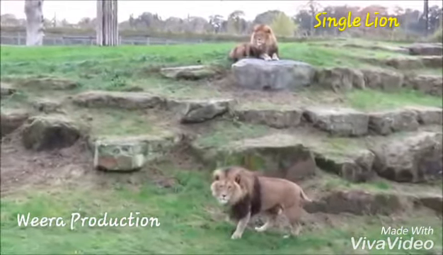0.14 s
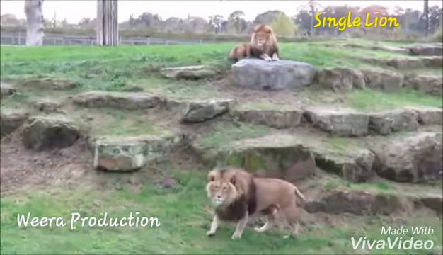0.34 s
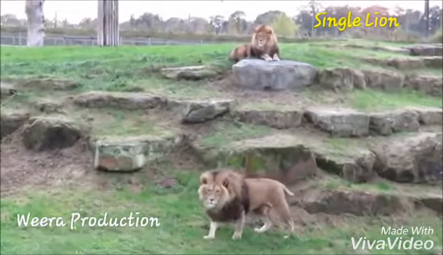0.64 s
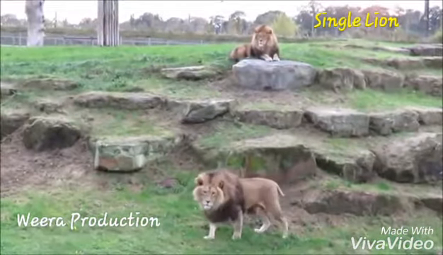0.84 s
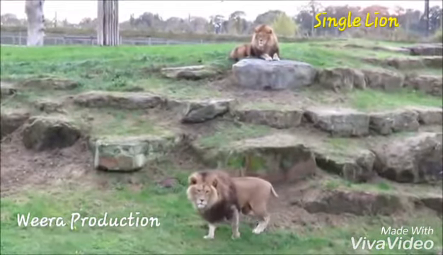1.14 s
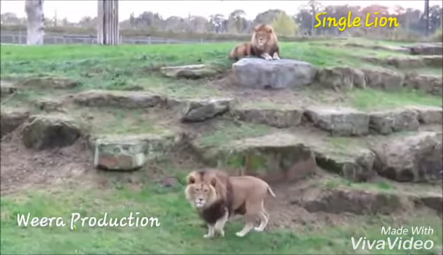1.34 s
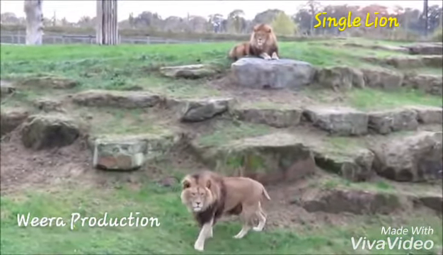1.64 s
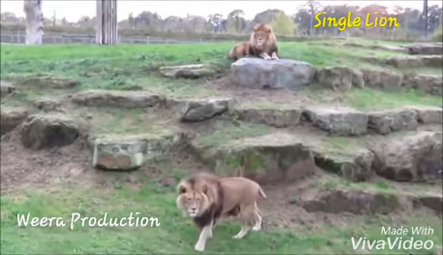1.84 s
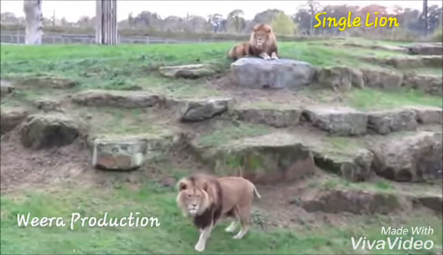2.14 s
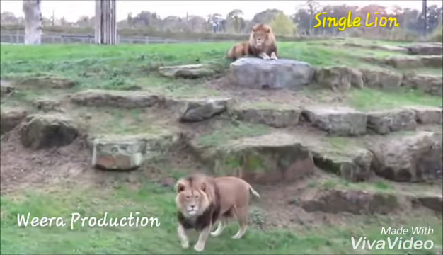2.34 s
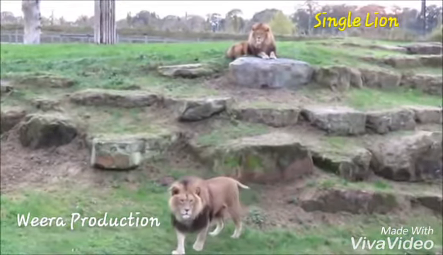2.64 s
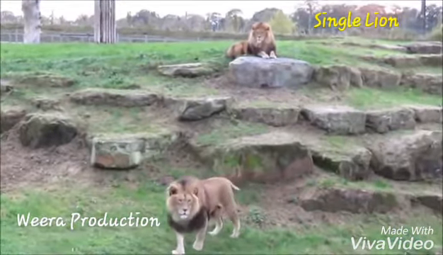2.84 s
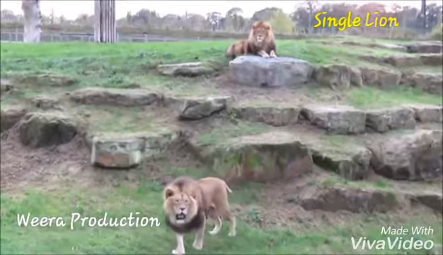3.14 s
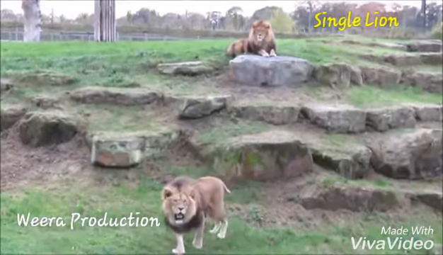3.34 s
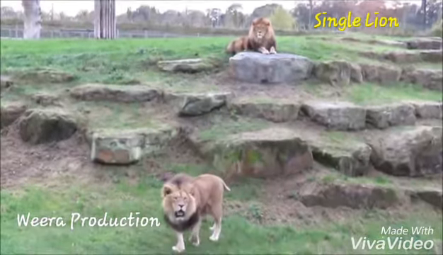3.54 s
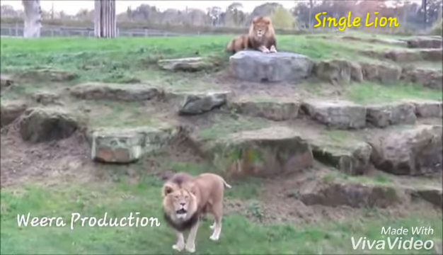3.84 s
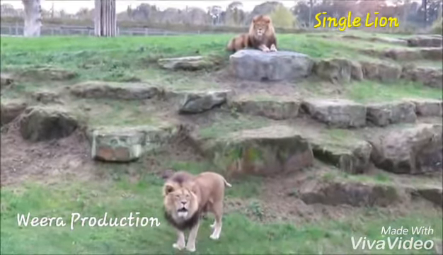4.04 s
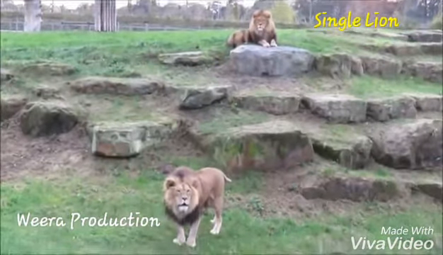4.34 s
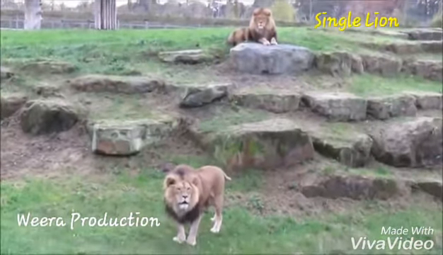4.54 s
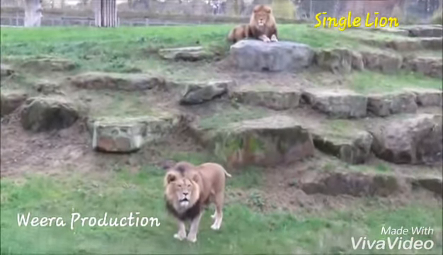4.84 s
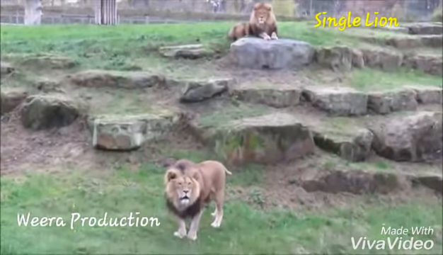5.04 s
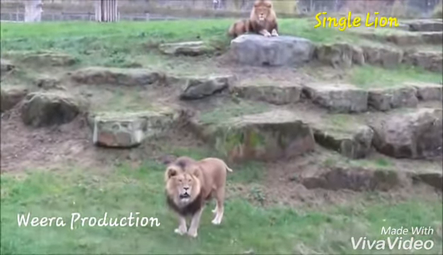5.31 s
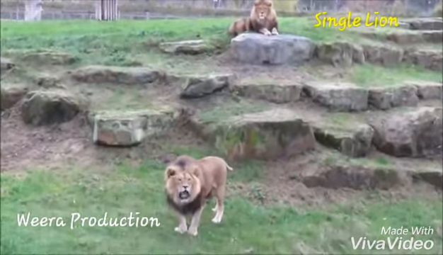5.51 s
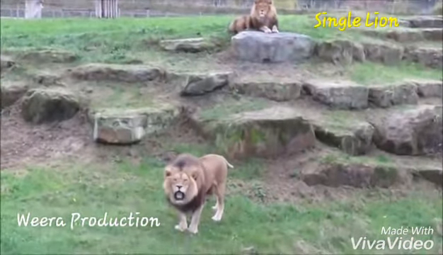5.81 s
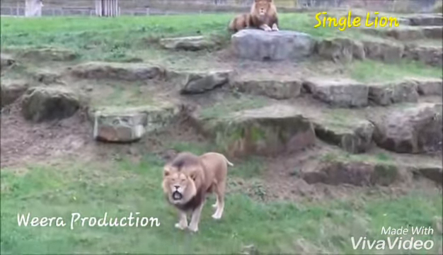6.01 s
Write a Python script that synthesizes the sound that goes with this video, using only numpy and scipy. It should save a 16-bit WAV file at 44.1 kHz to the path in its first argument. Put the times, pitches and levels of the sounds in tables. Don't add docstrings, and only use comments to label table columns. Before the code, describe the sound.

Wind rumbles and a crow caws over far traffic before a nearby lion lets out one throaty roar and starts another, cut off rising.

```python
import sys
import numpy as np
from scipy import signal
from scipy.fft import rfft, irfft, next_fast_len
from scipy.io import wavfile
from scipy.ndimage import uniform_filter1d

SR = 44100
rng = np.random.default_rng(int(sys.argv[2]) if len(sys.argv) > 2 else 0)


def volts_from_decibels(level):
    exponent = np.asarray(level, float) / 20
    return 10 ** exponent


def store_pcm(level_fs):
    pcm = np.round(np.clip(level_fs, -1, 1) * 32767).astype(np.int16)
    wavfile.write(sys.argv[1], SR, np.atleast_2d(pcm).T)


N = 272038

# [f/Hz, density/dB per Hz]
TRAFFIC_COLOUR = [(20, -27.5), (60, -13), (125, -6.5), (195, -1), (300, -10), (530, -12.5), (700, -10.5),
                  (1030, -11.5), (1600, -21.5), (2500, -31), (4000, -40.5), (7000, -47.5), (11000, -53),
                  (14000, -52)]
TRAFFIC_DB = -41
# [f/Hz, likeness 0-1]
TRAFFIC_LIKENESS = [(40, .84), (110, .93), (400, .97), (1400, .93), (2600, .82), (5000, .65), (12000, .5)]

# [f/Hz, density/dB per Hz]
WIND_COLOUR = [(12, -66), (20, -38.5), (53, -2), (112, -0.5), (258, -12), (357, -13), (461, -45.5),
               (500, -24), (650, -65.5), (1100, -120)]
# [start/s, length/s, level/dB]
GUSTS = [(0.0, 0.37, -35.5), (0.395, 0.27, -44), (0.89, 0.18, -44), (1.235, 0.16, -35), (1.49, 0.12, -36.5),
         (1.692, 0.056, -32), (1.908, 0.06, -34), (2.65, 0.2, -47), (4.328, 0.38, -34), (4.732, 0.13, -38),
         (4.88, 0.11, -40), (5.053, 0.22, -40), (5.379, 0.76, -36.5), (5.97, .25, -46)]
CALM_DB, GUST_RISE_S, GUST_SAG_DB, GUST_FALL_DB_PER_S = -78, 0.022, -7, 258
# [t/s, peak level/dB, f/Hz, length/cycles]
BUFFETS = [(0.015, -28, 156, 1.67), (0.055, -19, 127, 0.64), (0.099, -27.5, 91, 2.3),
           (0.228, -20.5, 207, 1.3), (0.31, -27.5, 115, 2.3), (0.327, -23.5, 188, 1.4),
           (1.72, -36, 124, 1.5), (3.013, -32, 199, 7.5), (3.012, -40.5, 359, 19), (3.099, -41.5, 232, 8.8),
           (3.153, -32, 287, 2.6), (3.15, -38.5, 624, 7.3), (5.469, -25, 160, 1.3), (5.506, -27, 132, 2.9),
           (5.566, -21, 108, 1.1), (5.676, -36.5, 345, 29)]

# [f/Hz, t60/s]
ROCK_DECAY = [(100, 1), (300, 0.68), (1000, 0.53), (4000, 0.58), (12000, 0.049)]
# [f/Hz, level/dB]
SIDE_SPREAD = [(60, -15.5), (150, -21), (260, -21), (500, -27.5), (1000, -19), (2000, -20), (5000, -14),
               (12000, -9.5)]

# [start/s, length/s, level/dB, pulse rate f/Hz, extra level of the top resonance/dB]
CAWS = [
    (0.971, 0.33, -55.5, 78.6, -14),
    (1.716, 0.36, -53, 81.3, -9.5),
    (2.55, 0.37, -52, 80.8, -14.5),
    (3.317, 0.26, -54.5, 80.2, -12),
    (5.128, 0.11, -79, 79.5, -10),
]
# [start f/Hz, end f/Hz, width/Hz, level/dB]
BEAK = [(1620, 1270, 125, 0), (1900, 1800, 180, -7), (2220, 1980, 240, -13), (2580, 3100, 170, 2)]
# [t/s, length/s, start f/Hz, end f/Hz, level/dB]
CHIRP = (1.39, .065, 5400, 5100, -67)
# [t/s, peak level/dB, f/Hz, ring/s]
CLICKS = [(1.021, -60, 13000, 0.0018), (1.052, -55, 12500, 0.016), (3.116, -28, 647, 0.0043),
          (3.146, -50, 3900, 0.0044), (3.174, -48, 3750, .004), (3.174, -56, 5200, 0.0046),
          (3.25, -29, 900, 0.003), (3.327, -50, 4850, 0.0054), (3.327, -45, 3430, .007),
          (3.352, -52, 4640, 0.0035), (3.369, -50, 4950, .003), (3.385, -50, 4940, .003),
          (3.369, -56, 6200, .005), (3.386, -56, 6200, 0.0056), (3.402, -50, 6000, .006),
          (3.417, -51, 5000, .003), (3.49, -49, 8500, 0.0033), (3.575, -48.5, 8550, 0.0057),
          (5.15, -34.5, 1950, 0.042), (5.17, -47, 2450, 0.033), (5.247, -30, 890, 0.0021),
          (5.6, -57, 10000, 0.0076), (5.612, -54, 5320, 0.0047), (5.64, -48, 5230, 0.0035),
          (5.658, -48, 4740, 0.0053), (5.671, -48, 4900, 0.005), (5.685, -35.5, 1986, 0.0033),
          (5.701, -43.5, 4730, 0.0059), (5.717, -48, 4300, 0.0082), (5.638, -31, 1740, 0.0066),
          (5.671, -41, 2600, 0.006), (5.701, -30, 1750, 0.0059), (5.59, -49, 5200, 0.044),
          (5.62, -39.5, 2700, .03)]

# [start/s, end/s, factor on the upper resonances, breath level/dB]
ROARS = [
    (3.445, 4.46, 1.02, 2.5),
    (5.88, 6.208, 1.06, -6),
]
# [t/s, level/dB]
EFFORT = [
    [(3.51, -26), (3.59, -25.5), (3.645, -17), (3.72, -17), (3.785, -14.5), (3.86, -20.5), (4.05, -17.5),
     (4.13, -22.5), (4.315, -28)],
    [(5.91, -54), (5.956, -32), (5.992, -37), (6.004, -29), (6.03, -28.5), (6.066, -22), (6.074, -21),
     (6.114, -15), (6.158, -12), (6.2, 2)],
]
RISE_DB_PER_S, FALL_DB_PER_S = 229, 483
# [t/s, level/dB]
CHEST = [
    [(3.51, -47), (3.59, -42), (3.715, -15), (3.765, -31), (3.87, -15.5), (3.97, -9.5), (4.08, -13.5),
     (4.14, -18), (4.315, -17)],
    [(5.91, -41), (5.96, -49), (6.0, -50), (6.11, -33.5), (6.2, -53)],
]
# [t/s, half length/s, level/dB]
CRACK = (4.123, .008, -17)
# [t/s, pitch f/Hz, roughness 0-1]
FOLDS = [
    [(3.6, 176, .25), (3.765, 146.5, .15), (3.86, 150.6, .04), (3.99, 141.8, .03), (4.055, 149.5, .22),
     (4.11, 147, .45), (4.16, 135, .7), (4.26, 130, .62), (4.335, 85, .55)],
    [(5.88, 150, .6), (5.99, 157, .42), (6.005, 169, .2), (6.055, 169, .2), (6.065, 153, .2),
     (6.08, 156, .2), (6.095, 165, .15), (6.17, 172, .1)],
]
ONSET_ROUGH, ONSET_S = .55, .07
# [start/s, full/s, end/s, drop of two pulses in three/dB, pitch jump factor]
GROWLS = [
    (3.6, 3.67, 3.748, 11, 1.43),
    (5.9, 6.0, 6.055, 12, 1),
]
GROWL_FADE_S, JUMP_ROUGH, JUMP_TILT_DB = .014, .95, -46
# [t/s, level/dB]
LEAK = [
    [(3.6, -1.5), (3.9, 5), (3.96, 1), (4.012, -3.5), (4.024, 1.5), (4.075, 0), (4.12, -2), (4.19, -1.5),
     (4.3, -1)],
    [(5.9, 3), (5.97, 7), (6.03, 5), (6.1, 2), (6.2, 5)],
]
RASP_FROM, RASP_SPAN = .1, .07
# [t/s, first f/Hz, second f/Hz, second level/dB, mouth opening level/dB]
JAW = [
    [(3.5, 370, 682, -5, -15), (3.6, 330, 553, -2.5, -17), (3.67, 482, 630, 1.5, -6.5),
     (3.78, 465, 652, -6.5, -19), (3.835, 410, 560, 7, -19), (3.852, 420, 558, -14.5, -13),
     (3.96, 417, 575, -17, -15), (4.07, 419, 603, -19, -2), (4.2, 394, 576, -18, -1.5)],
    [(5.9, 374, 603, -9, 3), (5.96, 364, 607, 8, -11), (5.99, 396, 613, 15, -15), (6.03, 337, 635, -5, -14),
     (6.065, 300, 660, -11, -9.5), (6.09, 498, 620, 1, -11), (6.115, 476, 623, -2.5, -11.5),
     (6.16, 537, 657, -13, -27)],
]
# [f/Hz, width/Hz, level/dB]
MOUTH = [(989.6, 67, 16), (1163, 153, 4.5), (1407, 46, 2.5), (1554, 210, -1.5), (1886, 107, -10),
         (2144, 110, -11), (2490, 140, -18.5), (3600, 67, -61)]
SAG_PER_S, TILT_DB = 0.044, 5
# [t/s, factor]
LIPS = [
    [(3.6, 1), (3.775, 1), (3.838, .84), (3.846, 1.19), (3.965, 1.135), (4.0, 1.0), (4.3, .98)],
    [(5.9, 1), (6.2, 1)],
]
BENT = (1, 0, 1, 0, 0, 0, 0, 0)
# [f/Hz, density/dB per Hz]
HISS_COLOUR = [(1500, -32), (2600, -1), (3200, -5), (4400, -2.5), (5200, -5), (6300, -9.5), (8000, -8),
               (10000, -12), (13000, -15), (15000, -30.5)]
HISS_DB, HISS_PER_OPEN, HISS_ROUGH_DB, HISS_GROWL_DB = -23.5, 1, -1.5, -21
HISS_LOW_DB, SLACK_HZ = 20, 135.6
# [multiple of the pitch, level/dB]
OVERTONES = [(1, 0), (2, -31), (3, -8), (4, -22), (5, -35), (6, -36), (7, -18), (8, -13.5), (9, -30.5),
             (10, -26), (11, -25.5), (12, -29.5), (13, -49), (14, -41), (15, -30.5), (16, -40), (17, -45),
             (18, -41.5), (19, -54)]
# [t/s, level/dB]
CLEAR = [(3.842, -61), (3.858, -29.5), (3.93, -27), (3.99, -24.5), (4.05, -35), (4.1, -33), (4.13, -58)]
# [t/s, length/s, start f/Hz, end f/Hz, level/dB]
GLIDES = [(3.58, .054, 2500, 2560, -49), (3.62, .2, 1620, 1490, -36), (3.66, .1, 1840, 1800, -44),
          (3.76, .09, 1010, 840, -32), (3.785, .04, 1220, 1200, -38), (3.755, .115, 2340, 2220, -41),
          (3.765, .07, 2200, 1980, -46), (4.0, .09, 2640, 2650, -44), (4.01, .085, 1430, 1425, -26),
          (3.99, .25, 750, 650, -33), (4.05, .27, 890, 880, -33), (5.96, .33, 2130, 2330, -37),
          (5.99, .07, 5250, 5100, -61), (6.065, .1, 5050, 5550, -58), (6.11, .1, 4300, 4000, -60),
          (3.84, .05, 1800, 1750, -42), (3.97, .06, 1000, 1000, -28), (6.03, .19, 270, 351, -21),
          (6.07, .26, 1130, 1480, -22), (6.07, .09, 2750, 2950, -51)]
# [t/s, length/s, start f/Hz, end f/Hz, level/dB]
TEETH = [(3.46, .23, 3390, 3350, -55), (3.575, .07, 4010, 4000, -59), (3.638, .055, 4400, 4380, -57),
         (3.672, .03, 5150, 5000, -60), (3.73, .055, 2900, 2950, -57), (3.765, .035, 4250, 4250, -60),
         (3.79, .05, 2050, 1950, -47), (3.855, .055, 2720, 2650, -52), (3.865, .055, 3350, 3180, -56),
         (3.845, .13, 4400, 4200, -58), (3.845, .13, 3900, 3620, -56), (3.93, .065, 2700, 2600, -53),
         (3.92, .1, 2200, 2130, -48), (4.04, .05, 5100, 5100, -54), (4.125, .05, 4550, 4550, -55),
         (4.15, .11, 3250, 3150, -53), (4.16, .11, 4250, 3950, -54), (4.155, .06, 5250, 5000, -55),
         (4.15, .05, 1650, 1640, -36), (4.2, .06, 2700, 2650, -49), (6.08, .1, 8300, 8350, -63)]
# [t/s, length/s, f/Hz, level/dB]
BLURS = [(3.46, .13, 450, -33), (3.632, .12, 400, -27.5), (3.4, 1, 62, -41.5), (3.84, .1, 3400, -60),
         (3.86, .077, 10000, -64), (5.88, .2, 1570, -45), (5.99, .38, 1900, -44.5),
         (5.86, .27, 7400, -65.5), (4.039, .32, 2270, -41), (4.109, .225, 300, -28),
         (5.88, .11, 480, -38.5), (5.945, .54, 433, -24.5), (4.02, .3, 4600, -56), (3.62, .16, 520, -26),
         (4.1, .22, 400, -29), (3.46, .16, 260, -36), (6.03, .28, 1500, -33)]
# [t/s, length/s, f/Hz, level/dB]
SNAP = (3.843, .03, 6500, -54)
NARROW_HZ, NARROW_SHARE, WHISTLE_SHARE, RUSH_SHARE = 30, .045, .02, .65

# [f/Hz, threshold/spreads of chance]
HOLES = [(5000, 3.5), (7500, 2), (10500, 1.4), (12300, .6), (13300, -.1), (14300, -.6)]
HOLE_PER_DB = .07


def evened(x):
    return x / np.sqrt(np.mean(x ** 2) + 1e-20)


def levelled(x, s=0.069):
    return x / np.sqrt(abs(uniform_filter1d(x ** 2, int(s * SR))) + 1e-14)


def read(points, hz):
    f, value = np.transpose(points)
    return np.interp(np.log(hz + 1), np.log(f + 1), value)


def follow(rows, t):
    s, *columns = np.transpose(rows)
    return [np.interp(t, s, c) for c in columns]


def add(mix, s, sound):
    part = mix[max(round(s * SR), 0):][:len(sound)]
    part += sound[:len(part)]


def resonate(x, hz, width):
    turn = np.exp(2j * np.pi * np.cumsum(hz * np.ones(len(x))) / SR)
    r = np.exp(-np.pi * width / SR)
    return 2 * (turn * signal.lfilter([1 - r], [1, -r], x / turn)).real


def steep(x, hz, width):
    return resonate(resonate(x, hz, width), hz, width)


def coloured(x, points):
    size = next_fast_len(len(x))
    gain = volts_from_decibels(read(points, np.fft.rfftfreq(size, 1 / SR)))
    return irfft(rfft(x, size) * gain, size)[:len(x)]


def patchy(x, spread_db):
    z = signal.stft(x, nperseg=256)[2]
    patches = uniform_filter1d(rng.standard_normal(z.shape), 4, axis=0)
    patches = evened(uniform_filter1d(patches, 12, axis=1))
    return signal.istft(z * volts_from_decibels(spread_db * patches), nperseg=256)[1][:len(x)]


def pulses(turns, late, size):
    last = len(turns) - 2
    at = np.interp(np.arange(len(late)) + 1 + late, turns, np.arange(len(turns) * 1.), right=last)
    whole = np.minimum(at.astype(int), last)
    out = np.zeros(len(turns))
    np.add.at(out, whole, size * (1 - at + whole))
    np.add.at(out, whole + 1, size * (at - whole))
    return out


def traffic():
    hz = np.fft.rfftfreq(2048, 1 / SR)
    a, b, c, d, patches = rng.standard_normal((5, len(hz), N // 512 + 5))
    patches = evened(uniform_filter1d(uniform_filter1d(patches, 25, 0), 8, 1))
    same = read(TRAFFIC_LIKENESS, hz)[:, None]
    right = a + 1j * b
    left = same * right + np.sqrt(1 - same ** 2) * (c + 1j * d)
    offset = np.exp(2j * np.pi * np.minimum(hz, 2500) * 3.6 / SR)[:, None]
    z = np.array([offset * left, right]) * volts_from_decibels(read(TRAFFIC_COLOUR, hz)[:, None] + 0.89 * patches)
    return volts_from_decibels(TRAFFIC_DB) * evened(signal.istft(z, nperseg=2048, noverlap=1536)[1][:, :N])


def wind():
    t = np.arange(N) / SR
    push = volts_from_decibels(CALM_DB)
    for s, length, db in GUSTS:
        fall_db = GUST_SAG_DB * (t - s) / length - GUST_FALL_DB_PER_S * np.maximum(t - s - length, 0)
        push = np.hypot(push, np.clip((t - s) / GUST_RISE_S, 0, 1) * volts_from_decibels(db + np.minimum(fall_db, 0)))
    *noises, slow = rng.standard_normal((4, N))
    lumpy = volts_from_decibels(0.7 * evened(uniform_filter1d(uniform_filter1d(slow, 900), 900)))
    shared, left, right = (evened(coloured(noise * lumpy, WIND_COLOUR)) for noise in noises)
    buffets = np.zeros(N)
    for at, peak_db, hz, cycles in BUFFETS:
        u = np.arange(-1.5 * cycles / hz, 1.5 * cycles / hz, 1 / SR)
        swell = np.exp(-(2.0 * u * hz / cycles) ** 2)
        add(buffets, at + u[0], -volts_from_decibels(peak_db) * swell * np.cos(2 * np.pi * hz * u))
    return push * (0.86 * shared + 0.59 * np.array([left, right])) + buffets


def rocks(x):
    taps = np.zeros((2, SR))
    slots = np.arange(500, SR - 20, 20)
    at = slots + rng.integers(0, 20, (2, len(slots)))
    np.put_along_axis(taps, at, rng.choice([-1., 1.], at.shape), 1)
    taps[1] = taps[0] + 0.28 * taps[1]
    hz, t, z = signal.stft(taps, SR, nperseg=512)
    tail = signal.istft(z * volts_from_decibels(-60 * t / read(ROCK_DECAY, hz)[:, None]), SR, nperseg=512)[1]
    return signal.fftconvolve(x[None], tail / np.linalg.norm(tail[0]), axes=1)[:, :N]


def side_spread(x):
    scatter = irfft(np.exp(2j * np.pi * rng.random(201)))
    side = coloured(signal.oaconvolve(x, scatter)[:N], SIDE_SPREAD)
    return side * (.4 + .9 * evened(uniform_filter1d(rng.standard_normal(N), 350)))


def crow():
    out = np.zeros(N)
    for s, length, db, hz, top_db in CAWS:
        u = np.linspace(0, 1, int(.4 * SR)) * 0.47 / length
        late, size_db = rng.standard_normal((2, int(hz * length)))
        drive = pulses(np.cumsum(hz + 0 * u) / SR, 0.0318 * late, volts_from_decibels(size_db))
        drive = evened(drive) + .5 * rng.standard_normal(len(u))
        bend = np.clip(u, 0, 1) ** 2.53
        call = 0
        for from_hz, to_hz, width, level_db in BEAK:
            rising = to_hz > from_hz
            gain = volts_from_decibels(level_db + (top_db - 9.6 * bend) * rising)
            call = call + gain * steep(drive, from_hz + (to_hz - from_hz) * bend, width)
        fade = np.clip(np.minimum(u / .12, (1 - u) / .3), 0, 1)
        add(out, s, volts_from_decibels(db) * evened(call) * fade)
    return out


def chirp():
    out = np.zeros(N)
    s, length, high_hz, low_hz, db = CHIRP
    count = int(length * SR)
    turns = np.cumsum(np.linspace(high_hz, low_hz, count)) / SR
    add(out, s, volts_from_decibels(db) * np.hanning(count) * np.sin(2 * np.pi * turns))
    return out


def lip_clicks():
    out, u = np.zeros(N), np.arange(2700) / SR
    for s, db, hz, ring in CLICKS:
        burst = rng.standard_normal(len(u)) * u / ring * np.exp(-2 * u / ring)
        add(out, s, volts_from_decibels(db - 23) * evened(steep(burst, hz, 0.27 * hz)))
    return out


def effort(rows, t):
    before, after = np.maximum(rows[0][0] - t, 0), np.maximum(t - rows[-1][0], 0)
    return follow(rows, t)[0] - RISE_DB_PER_S * before - FALL_DB_PER_S * after


def fold_slaps(turns, rough, drop_db):
    late, size_db = rng.standard_normal((2, int(turns[-1])))
    cycle = np.arange(len(late))
    rough, drop_db = (np.interp(cycle + 1, turns, curve) for curve in (rough, drop_db))
    return pulses(turns, 0.22 * rough * late, volts_from_decibels(0.7 * rough * size_db - drop_db * (cycle % 3 > 0)))


def throat_sound(drive, rush, rough, first_hz, second_hz, second_db):
    throat = steep(drive, first_hz, 70) - volts_from_decibels(second_db) * steep(drive, second_hz, 75)
    return throat + 1.36 * rough * steep(rush, (first_hz + second_hz) / 2, 220)


def mouth_sound(drive, rush, rough, growl, stretch, lips, tilt_db):
    blur = resonate(rush, 1000, 390) + 0.15 * resonate(rush, 1270, 600) + 0.08 * resonate(rush, 2050, 700)
    mouth = 0.17 * rough * blur + 0.035 * (1 - .85 * growl) * steep(drive, 1800, 1000)
    for j, (hz, width, db) in enumerate(MOUTH):
        gain = (-1) ** j * volts_from_decibels(db + tilt_db * np.log2(hz / MOUTH[0][0]))
        mouth += gain * steep(drive, hz * stretch * lips ** BENT[j], width)
    return mouth


def passing_resonances(airy, t):
    events = [(*row, NARROW_HZ + NARROW_SHARE * row[2]) for row in GLIDES]
    events += [(*row, WHISTLE_SHARE * row[2]) for row in TEETH]
    events += [(s, length, hz, hz, db, RUSH_SHARE * hz) for s, length, hz, db in [*BLURS, SNAP]]
    out = np.zeros(len(t))
    for at, length, from_hz, to_hz, db, width in events:
        part = slice(*np.searchsorted(t, [at, at + length]))
        u = (t[part] - at) / length
        path = from_hz + (to_hz - from_hz) * u
        if len(u):
            line = steep(steep(airy[part], path, 1.8 * width), path, 1.8 * width)
            out[part] += volts_from_decibels(db) * np.sin(np.pi * u) * levelled(line)
    return out


def roar(k):
    start, end, upper, breath_db = ROARS[k]
    t = start + np.arange(round((end - start) * SR)) / SR
    throat_db, chest_db = effort(EFFORT[k], t), effort(CHEST[k], t)
    crack_s, crack_half_s, crack_db = CRACK
    chest_db += crack_db * np.exp(-((t - crack_s) / crack_half_s) ** 2)
    first_hz, second_hz, second_db, open_db = follow(JAW[k], t)

    begin, full, stop, drop_db, jump = GROWLS[k]
    growl = np.clip(np.minimum((t - begin) / (full - begin), 1 + (stop - t) / GROWL_FADE_S), 0, 1)
    lift = (jump - 1) * growl
    hz, rough = follow(FOLDS[k], t)
    hz = hz * (1 + lift)
    rough = rough + JUMP_ROUGH * lift + ONSET_ROUGH * np.maximum(1 - (t - start) / ONSET_S, 0)
    turns = np.cumsum(hz) / SR

    rush_noise, hiss_noise, air_noise = rng.standard_normal((3, len(t)))
    slaps = fold_slaps(turns, rough, drop_db * growl)
    puff = levelled(signal.lfilter([1], [1, -np.exp(-1 / (.0035 * SR))], slaps))
    rush = rough ** 1.5 * levelled((puff + 1.6 * rough ** 3) * rush_noise)
    drive = (1 - .3 * rough) * levelled(slaps) + 2.2 * rush

    throat = throat_sound(drive, rush, rough, first_hz, second_hz, second_db)
    stretch, tilt_db = upper - SAG_PER_S * (t - start), TILT_DB + JUMP_TILT_DB * lift
    mouth = mouth_sound(drive, rush, rough, growl, stretch, follow(LIPS[k], t)[0], tilt_db)
    dulling = signal.butter(6, 2700, fs=SR, output="sos")
    throat, mouth = signal.sosfilt(dulling, [throat, mouth])

    hiss_db = throat_db + breath_db + HISS_DB + HISS_PER_OPEN * open_db + HISS_GROWL_DB * lift
    hiss_db += HISS_ROUGH_DB * np.clip((rough - RASP_FROM) / RASP_SPAN, 0, 1)
    hiss_db += follow(LEAK[k], t)[0]
    hiss_db += HISS_LOW_DB * np.minimum(np.log2(hz / SLACK_HZ), 0)
    smooth = .03 + .97 * (1 - growl) ** 3
    breath = (.2 + rough) * (1.3 + smooth * puff) * hiss_noise + .22 * smooth * drive
    hiss = patchy(coloured(breath, HISS_COLOUR), spread_db=3.5)

    wobble = evened(uniform_filter1d(uniform_filter1d(air_noise, 400), 400)) * rough
    chest = np.sqrt(2) * np.cos(2 * np.pi * turns + .2 * wobble)
    ringing = sum(volts_from_decibels(db) * np.cos(2 * np.pi * m * turns + .4 * m * m) for m, db in OVERTONES[4:])

    voice = volts_from_decibels(chest_db) * chest + volts_from_decibels(throat_db) * levelled(throat)
    voice += volts_from_decibels(throat_db + open_db) * levelled(mouth) + volts_from_decibels(hiss_db) * levelled(hiss)
    voice += volts_from_decibels(follow(CLEAR, t)[0]) * evened(ringing)
    air = np.minimum(.03 + 3 * rough + growl, .7) * levelled((puff + .3) * air_noise)
    voice += passing_resonances((1 - .85 * growl) * drive + air, t)
    return start, voice * np.clip(np.minimum((t - t[0]) / 0.017, (t[-1] - t) / 0.018), 0, 1)


def scene():
    lion, caws = np.zeros(N), crow()
    for k in range(len(ROARS)):
        add(lion, *roar(k))
    near = lion + lip_clicks() + chirp()
    side = side_spread(near)
    thin = signal.sosfilt(signal.butter(2, 450, "high", fs=SR, output="sos"), lion)
    echo = rocks(volts_from_decibels(-15.5) * thin + volts_from_decibels(-3.5) * caws)
    return near + np.array([side, -side]) + caws + echo + traffic() + wind()


def dropouts(x):
    hz, _, z = signal.stft(x, SR, nperseg=512, noverlap=384)
    treble_power = (abs(z[0, hz > 6000]) ** 2).mean(0)
    level_db = uniform_filter1d(10 * np.log10(treble_power + 1e-20), size=9)
    chance = rng.standard_normal((len(hz) // 4 + 1, z.shape[2] // 8 + 1))
    chance = evened(uniform_filter1d(chance, size=2, axis=1))
    chance = np.kron(chance, np.ones((4, 8)))[:len(hz), :z.shape[2]]
    lost = chance > read(HOLES, hz)[:, None] + HOLE_PER_DB * (level_db - np.median(level_db))
    return signal.istft(z * np.where(lost, .03, 1), SR, nperseg=512, noverlap=384)[1][:, :N]


def top_cut(x):
    return signal.sosfilt(signal.butter(12, 14800, fs=SR, output="sos"), x)


def record(dry):
    limited = signal.oaconvolve(dry, signal.firwin(63, 13800, fs=SR)[None], "same")
    return top_cut(dropouts(limited))


dry = scene()
out = record(dry)
store_pcm(out)
```